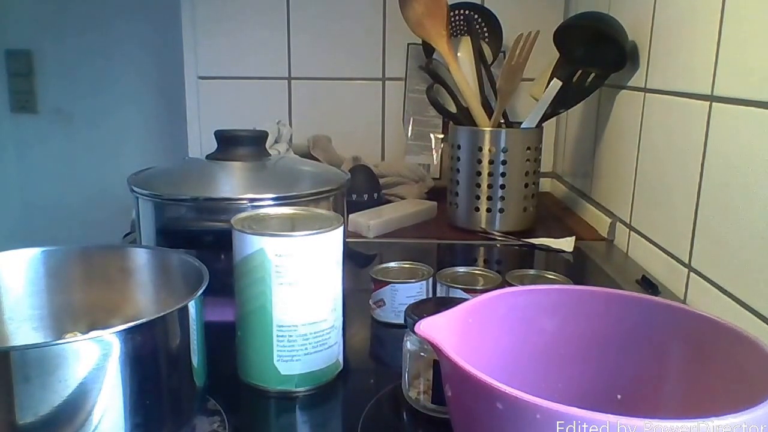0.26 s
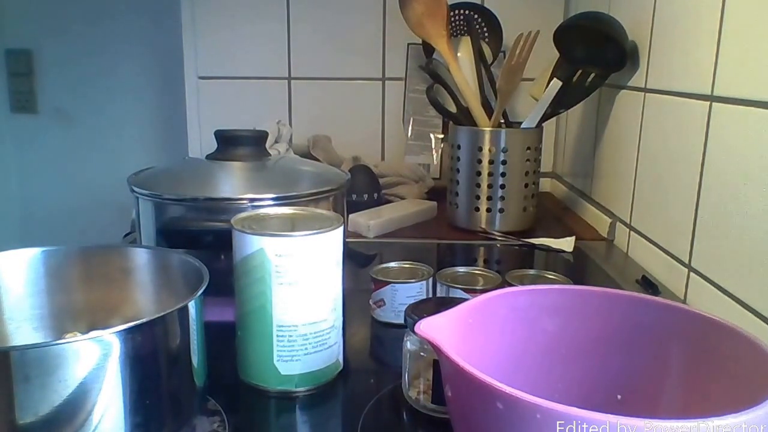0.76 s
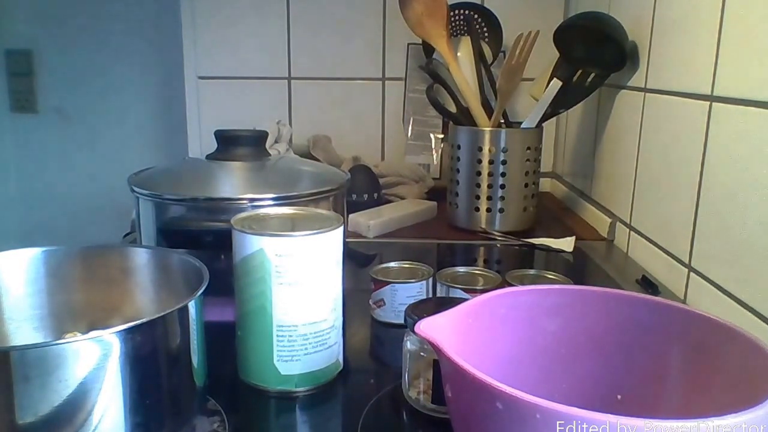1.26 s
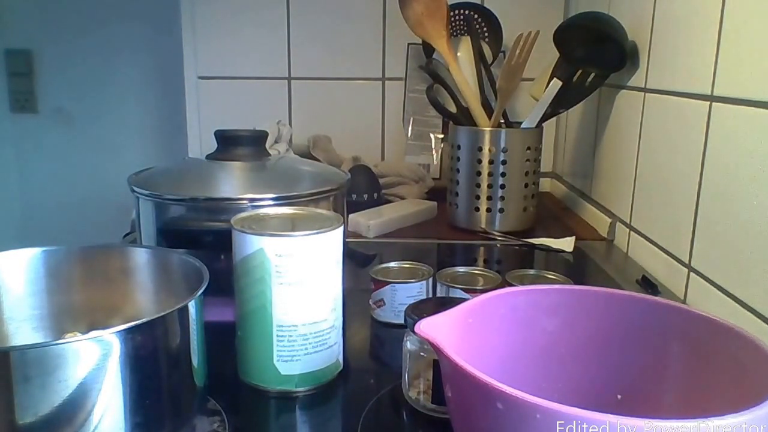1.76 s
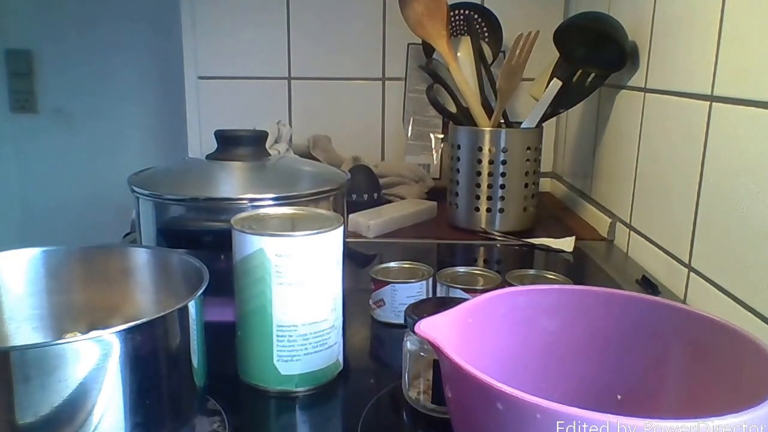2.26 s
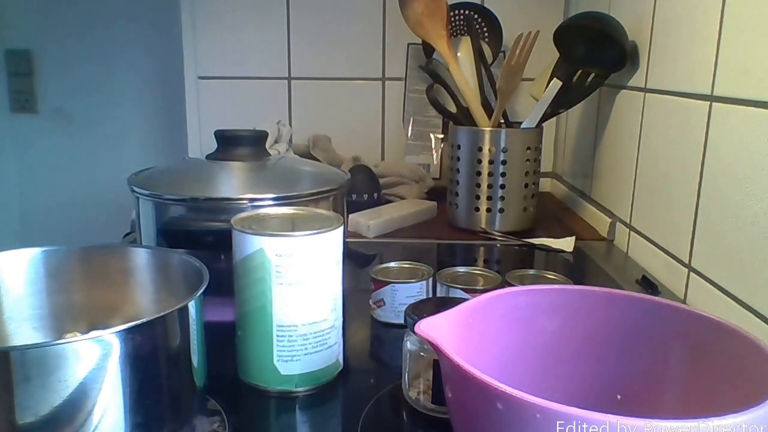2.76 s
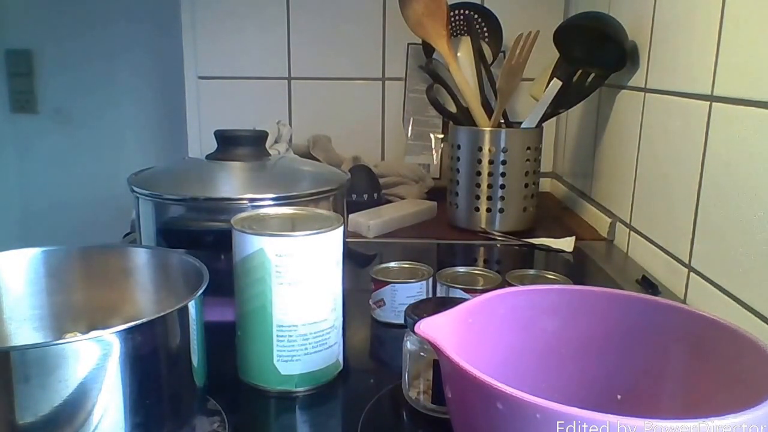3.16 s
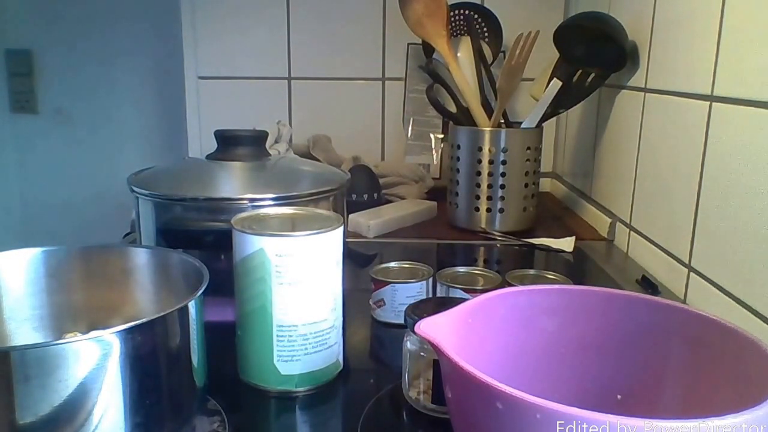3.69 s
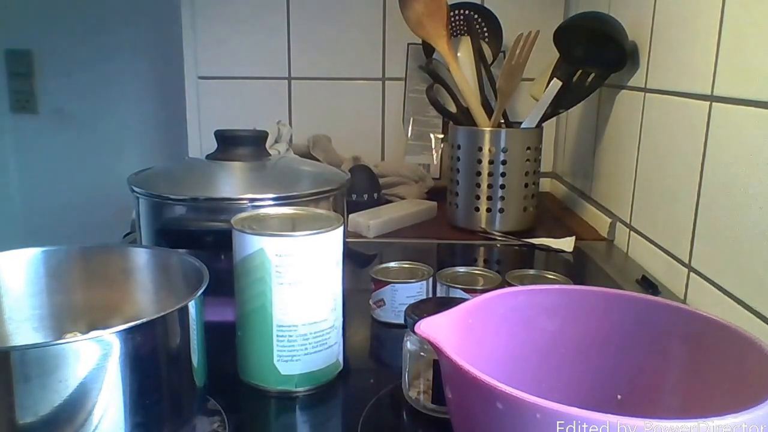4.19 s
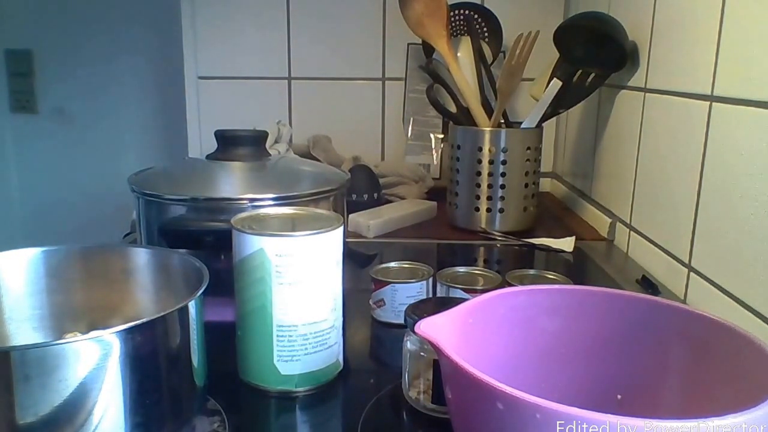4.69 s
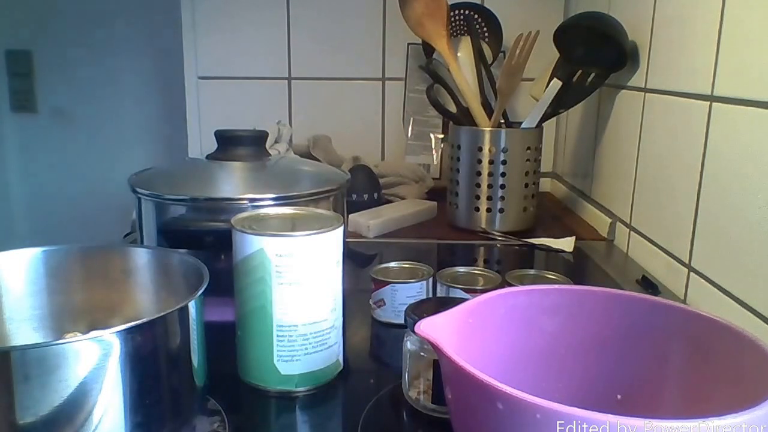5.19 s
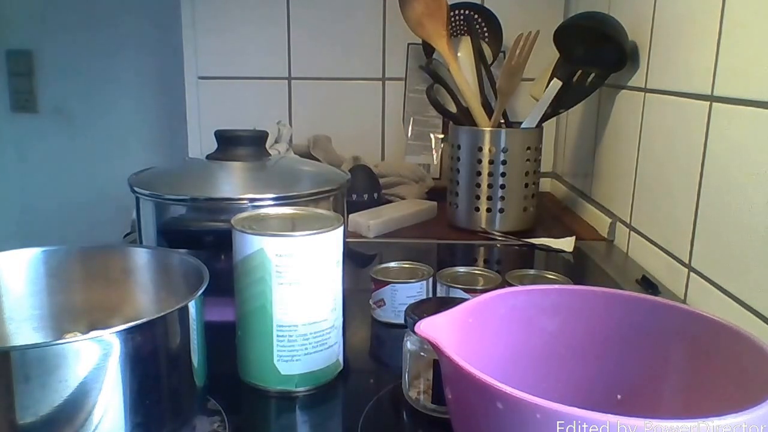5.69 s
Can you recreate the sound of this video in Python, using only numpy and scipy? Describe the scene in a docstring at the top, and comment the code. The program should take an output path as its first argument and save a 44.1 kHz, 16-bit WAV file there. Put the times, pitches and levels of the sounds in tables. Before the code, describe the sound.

A steel pot clatters briefly in a small kitchen, followed by lighter knocks, scuffs and a tin's clink over a humming fan.

```python
"""A small tiled kitchen, where someone moves things about while a fan runs and the mains hums.
A steel pot is shifted on a shelf in a quick cluster of hollow knocks; softer wooden bumps follow,
and later a tin slides and clinks. Each knock makes the object ring, rattle briefly and bounce once.
In between come light utensil taps, and faint scuffs and soft footfalls made of rubbing noise.
The tiles add a short echo to these sounds. Behind them the fan's blades drone and its air rushes."""
import sys
import numpy as np
from scipy import signal
from scipy.fft import rfft, irfft
from scipy.io import wavfile

SR = 44100
rng = np.random.default_rng(int(sys.argv[2]) if len(sys.argv) > 2 else 0)


def unload_audio(sound):
    """Save the sound as a 16-bit wav file, at the path given as the first command line argument."""
    columns = np.transpose(np.atleast_2d(sound))
    # keep every value between -1 and 1, then stretch to whole-number steps
    steps = np.round(np.clip(columns, -1, 1) * 32767)
    wavfile.write(sys.argv[1], SR, steps.astype(np.int16))


N = 261954

ROTOR_HZ, MAINS_HZ = 42.96, 50  # turns of the fan and cycles of the mains in one second
CUTOFF_HZ = 7550  # the top of the treble
FAVOUR_OCTAVES = 0.062  # the spot that is hit boosts the tones about this close to a favoured pitch
SCUFF_T60_S, SCUFF_T60_PER_RISE = 0.22, 7  # t60 is the time a sound takes to fade by 60 dB
FOOTFALL_RISE_S, FOOTFALL_T60_S, WEIGHT_BELOW_HZ = 0.022, 0.27, 150

# Knocks on each object: t/s, level/dB, hollowness/dB, steely edge/dB, hardness/dB,
# bounce delay/s, boost/dB, favoured f/Hz (two of these for the pot)
POT_KNOCKS = [(0.470, -20, 6.5, -1, 16.5, 0.016, 8.3, 372, 4990),
              (0.500, -22, 0.5, -3, 10.5, 0.011, 15, 1013, 381),
              (0.587, -22, 2, 2, 0, 0.018, 8.8, 822, 230.6), (0.630, -25, -5, -4, 3.5, 0.018, 12, 202, 610),
              (0.652, -15.5, -7.5, -5.5, 2.5, 0.014, 6.8, 1316, 2262),
              (0.698, -24.5, -11, -7, 1, 0.012, 11.8, 966, 1090),
              (0.714, -24.5, -5, -11, -0.5, 0.009, 14.7, 150, 1316),
              (0.785, -45, -23, 10.5, 3, 0.024, 11, 1550, 2702)]
SHELF_KNOCKS = [(1.116, -34, -11, -2.5, -2.5, 0.019, 10.5, 233),
                (1.155, -37.5, -1, 1, -13, 0.03, 12.5, 240), (1.592, -35.5, -3, 1, -1.5, 0.017, 4, 1600),
                (1.612, -37.5, -1.5, 5, -11, 0.02, 7, 683), (1.634, -46, -2, -3, -14, 0.02, 12.5, 246),
                (4.560, -42, 4.5, -4, 6.5, 0.031, 7, 664), (4.605, -49, -5, -3.5, -19, 0.0095, 8, 340)]
TIN_KNOCKS = [(4.529, -34.5, -2.5, -7, 28.5, 0.012, 1, 3560)]
UTENSIL_KNOCKS = [(0.205, -45, -14.5, -4.5, 25.5, 0.021, 2, 2780),
                  (1.156, -49, -9, -1, 11, 0.017, 14, 2830), (1.367, -38.5, -7, 1, 5, 0.012, 9.5, 3140),
                  (1.382, -44, 2, -8, 1, 0.008, 6, 470), (3.256, -40, -13, -8, 17.5, 0.0089, 7, 4400)]
# The tones each object rings with: f/Hz, level/dB, t60/s
POT_TONES = [(146.7, -10, 0.15), (201.7, -2, 0.11), (228.4, 0.5, 0.11), (344, 1, 0.13), (369.7, -5.5, 0.19),
             (451.4, -8.5, 0.15), (616, -11, 0.16), (686.5, -2, 0.12), (748, -1.5, 0.09), (820, -10, 0.27),
             (955, -20.5, 0.51), (980, -1.5, 0.13), (1006, -4.5, 0.095), (1039, -14, 0.34),
             (1082, -3, 0.08), (1156, -20.5, 0.45), (1230, -12, 0.17), (1313.6, -7.5, 0.21),
             (1555, -13.5, 0.31), (1610, -4.5, 0.13), (1693, -6.5, 0.13), (1747, -4.5, 0.05),
             (1900, -17.5, 0.18), (2157, -14.5, 0.23), (2264, -11, 0.17), (2702, -24.5, 1),
             (2750, -17, 0.16), (3530, -10.5, 0.088), (3910, -6, 0.09), (4253, -12, 0.1), (4790, -8, 0.2),
             (4970, -8, 0.071), (5240, -19, .18), (5900, -12.5, 0.14), (6500, -4, 0.12),
             (6940, -11.5, 0.18), (7090, -6, 0.13)]
SHELF_TONES = [(238.2, 12, 0.075), (327, 0, 0.2), (490, 5, 0.17), (703, -3.5, 0.098), (1035, -4, 0.11),
               (1123, -6, 0.1), (1620, -7.5, 0.088), (1957, -3, 0.12)]
TIN_TONES = [(985, 0.5, 0.092), (1340, 2.5, 0.084), (2010, -5, 0.096), (2180, 3, 0.13), (2400, -6, 0.085),
             (2720, -5, 0.093), (3560, -0.5, 0.068), (3850, -2, 0.077), (4450, -5, 0.09), (4600, -4, .1),
             (4860, -1.5, 0.17), (4880, -1, .075), (5730, -11.5, .08), (6360, 1, .08), (6950, -2.5, 0.065)]
UTENSIL_TONES = [(470, 4.5, 0.066), (896, -2, 0.1), (1244, -4, 0.098), (1670, -10.5, 0.15),
                 (2280, -1.5, 0.091), (2810, -4, 0.075), (3144, -5, 0.075), (3740, -4, 0.11),
                 (4600, -0.5, 0.11), (5320, -10.5, .14), (6230, -3, 0.11), (6580, -4, .11),
                 (7030, -1.5, 0.12)]
# The five bands of a knock (thud, hollow, clank, edge, click): f/Hz
KNOCK_BANDS_HZ = [200, 390, 1150, 1750, 4500]
# Those bands for a hit on the middle of an object's side: level/dB
KNOCK_BANDS_DB = [3, 2, 4, -1, -24]
# Hard hits click and soft ones thud: each band's share of the hardness
HARDNESS_SHARES = [-0.69, 0.04, -0.035, 0.22, 0.68]
# Tone colour of the crack of a hard hit: f/Hz, level/dB
CRACK_COLOUR = [(70, -55.5), (140, -12.5), (350, 12), (540, 0.5), (750, 1), (1100, -5), (1430, -12.5),
                (1650, -8.5), (2200, -10), (2500, -14.5), (2900, -15), (3300, -25.5), (4300, -12.5),
                (5000, -8), (7300, -16)]
# Smooth slides: middle t/s, spread/s, centre f/Hz, width/Hz, level/dB
SLIDES = [(2.254, 0.042, 1790, 1100, -51), (3.82, 0.048, 2200, 3000, -56.5), (4.15, 0.043, 694, 504, -39.5),
          (4.335, 0.053, 5000, 3000, -58.5), (4.462, 0.016, 1650, 1100, -45.5),
          (4.53, 0.086, 796, 590, -37.5), (4.69, 0.053, 676, 500, -43), (5.025, 0.034, 4780, 2420, -48),
          (5.298, 0.022, 5200, 1800, -49.5)]
# Scuffs: t/s, rise/s, level/dB, hiss compared with the rub/dB
SCUFFS = [(0.208, 0.016, -41, -17), (1.511, 0.021, -42, -17), (2.205, 0.032, -45.5, -13.5),
          (3.247, 0.015, -46.5, -1), (3.851, 0.018, -41.5, -21), (4.366, 0.013, -40.5, -4),
          (4.399, 0.021, -42, -0.5), (4.439, 0.0082, -41.5, -12.5), (4.829, 0.017, -52, 4.5),
          (4.882, 0.021, -38, -16), (5.138, 0.015, -49.5, -6), (5.258, 0.011, -48, 4.5),
          (5.335, 0.046, -40.5, -15.5), (5.408, 0.016, -43, -9.5), (5.521, 0.024, -39, -14.5),
          (5.803, 0.025, -40.5, -15), (5.856, 0.014, -43, -5.5)]
# The three bands of a scuff (bass, rub, hiss): f/Hz
SCUFF_BANDS_HZ = [90, 1000, 5000]
# Tone colour of rubbing: f/Hz, level/dB
RUB_COLOUR = [(30, -18.5), (60, -2.5), (110, 12.5), (250, 2.5), (600, -13), (1000, 1), (2000, 0),
              (3000, -10), (4100, -10.5), (5000, -7.5), (6200, -7), (7300, -11)]
# Soft steps and thuds of shifting weight: t/s, level/dB, extra deep bass/dB
FOOTFALLS = [(0.218, -30, 0), (0.699, -43.5, 2), (3.785, -36, 7), (3.861, -44, 4), (4.835, -36, 2.5),
             (5.312, -36, -5), (5.359, -40, 1)]
# A sole muffles all but the thump: f/Hz, level/dB
SOLE_COLOUR = [(40, -6.5), (65, -0.5), (100, -3.5), (220, -3), (1000, -9), (5000, -20)]
# How long the kitchen echoes: f/Hz, t60/s
KITCHEN_T60 = [(80, 0.19), (250, 0.24), (1000, 0.35), (3000, 0.81), (7000, 0.72)]
# Loudness of the fan's blade tone and of the octave above it: t/s, level/dB
BLADE_LEVEL = [(0, -41.5), (1.0, -38.5), (1.83, -45), (2.6, -38), (4.7, -40.5), (5.9, -37)]
OCTAVE_LEVEL = [(0, -38), (0.23, -57.5), (0.5, -33.5), (1.3, -43), (1.95, -36), (2.25, -40), (3.3, -37.5),
                (3.65, -40), (5.3, -38.5), (5.9, -40)]
# Weak fan tones: multiple of the turning speed, level/dB
WEAK_FAN_TONES = [(3, -54.5), (7, -52.5), (12, -60.5)]
# Tone colour of the rushing air: f/Hz, level/dB
AIR_COLOUR = [(35, -28.5), (60, -30.5), (85, -8), (112, -12), (135, 2), (200, 2.5), (265, -6), (400, -5.5),
              (800, -6.5), (1250, -15), (2000, -18), (3100, -30.5), (5000, -34), (7400, -36.5)]
# Resonances that the air sets ringing: f/Hz, width/Hz, level/dB
AIR_PEAKS = [(182, 20, -6.5), (239, 20, -5), (341.6, 24.4, 8.5), (460, 17, 1), (685, 31, -3.5),
             (1178, 270, -1.5)]
# Tones of the mains hum: multiple of the mains frequency, level/dB
MAINS_TONES = [(2, -57), (3, -46), (6, -75.5), (10, -61.5)]


def knocks(hits, tones, ring_db, buzz_db, crack_db, rise_s, rattle_t60, sharpness=19.8, hold_s=0.019):
    """Each touch makes an object ring with its own tones and rattle briefly on what it stands on."""
    out, t = np.zeros(N), np.arange(SR // 2) / SR
    rattle = decay(t - hold_s, rattle_t60)
    for start_s, bands_db, boost_db, favoured_hz in hits:
        colour = list(zip(KNOCK_BANDS_HZ, bands_db))
        sound = from_db(crack_db) * noise(len(t), CRACK_COLOUR, colour, overtones()) * rattle
        tremble = rng.standard_normal(len(t))
        for hz, db, t60 in tones:
            # every spot that is hit rings a little differently
            pitch_hz, tone_db = hz * rng.normal(1, .003), rng.normal(db, 1.2)
            closeness = np.exp(-(np.log2(hz / favoured_hz) / FAVOUR_OCTAVES) ** 2).max()
            gain = from_db(tone_db + boost_db * closeness + at_hz(colour, hz))
            ring = decay(t, t60) * np.sin(2 * np.pi * (pitch_hz * t + rng.random()))
            # the rattle smears each tone into a narrow buzz
            buzz = noise_band(tremble, hz, hz / sharpness) * rattle
            sound += gain * (from_db(ring_db) * ring + from_db(buzz_db) * buzz)
        # echoes from close walls pile up over the first milliseconds
        add(out, start_s, sound * swell(t, rise_s))
    return out


def bounces(blows, loss_db, softening_db):
    """An object lands and bounces once; the bounce is softer, or harder if softening_db is negative."""
    for start_s, level_db, hollowness, edge, hardness, delay_s, boost_db, *favoured_hz in blows:
        for bounce in (0, 1):
            colour_db = np.add(KNOCK_BANDS_DB, np.multiply(HARDNESS_SHARES, hardness - bounce * softening_db))
            colour_db[1] += hollowness
            colour_db[3] += edge
            bands_db = level_db - bounce * loss_db + colour_db
            yield start_s + bounce * delay_s, bands_db, boost_db, np.array(favoured_hz)


def overtones(ripple_db=7.5, count=90):
    """Crowded high resonances, different at every spot that is touched: rows of f/Hz, level/dB."""
    hz = np.linspace(1500, CUTOFF_HZ, count)
    return np.column_stack([hz, ripple_db * rng.standard_normal(count) * (hz > hz[0])])


def slides():
    """Smooth rubbing swells and fades in one broad resonance of the sliding thing."""
    out, t = np.zeros(N), np.arange(N) / SR
    for middle_s, spread_s, centre_hz, width_hz, db in SLIDES:
        rub = noise_band(rng.standard_normal(N), centre_hz, width_hz)
        out += from_db(db) * rub * np.exp(-((t - middle_s) / spread_s) ** 2)
    return out


def scuffs(bass_db=-24.0):
    """Short scrapes: one that starts more slowly also fades more slowly."""
    out = np.zeros(N)
    for start_s, rise_s, db, hiss_db in SCUFFS:
        colour = list(zip(SCUFF_BANDS_HZ, (bass_db, 0, hiss_db)))
        t60 = SCUFF_T60_S + SCUFF_T60_PER_RISE * rise_s
        add(out, start_s, from_db(db) * rubbing(colour, rise_s, t60))
    return out


def footfalls():
    """Weight shifts onto a sole, which muffles the rubbing into a low thump."""
    out = np.zeros(N)
    for start_s, db, weight_db in FOOTFALLS:
        colour = [(hz, level + weight_db * (hz < WEIGHT_BELOW_HZ)) for hz, level in SOLE_COLOUR]
        add(out, start_s, from_db(db) * rubbing(colour, FOOTFALL_RISE_S, FOOTFALL_T60_S))
    return out


def rubbing(colour, rise_s, t60):
    """Two surfaces rub in a burst of noise that swells and dies away."""
    t = np.arange(SR // 2) / SR
    rub = noise(len(t), RUB_COLOUR, colour, overtones(ripple_db=3.0))
    return rub * swell(t, rise_s) * decay(t - rise_s, t60)


def kitchen_echo(sound, echo_db=-8.0, first_echo_s=0.0011):
    """Tiled walls add a short, dense echo that lasts longer in the treble than in the bass."""
    t, tail = np.arange(SR) / SR, 0
    for low_hz in 40 * 2 ** np.arange(8):
        octave_filter = signal.butter(2, [low_hz, 2 * low_hz], "band", fs=SR, output="sos")
        band = signal.sosfilt(octave_filter, rng.standard_normal(SR))
        fade = decay(t, at_hz(KITCHEN_T60, low_hz * np.sqrt(2))) * np.minimum(t / first_echo_s, 1)
        tail = tail + band * fade / np.linalg.norm(fade)
    return sound + from_db(echo_db) * signal.fftconvolve(sound, tail)[:N]


def fan_drone():
    """Four blades pass in each turn, making a tone, its octave and a few weak extra tones."""
    blade = gain_curve(BLADE_LEVEL) * hum(ROTOR_HZ, [(4, 0)], waver_db=.6, wander_hz=.025)
    octave = gain_curve(OCTAVE_LEVEL) * hum(ROTOR_HZ, [(8, 0)], waver_db=.9, wander_hz=.025)
    return blade + octave + hum(ROTOR_HZ, WEAK_FAN_TONES, waver_db=2.0, wander_hz=0.018)


def fan_air(start_db=-38, rise_db_per_s=0.1536):
    """The fan's rush of air, coloured by its housing and the room, slowly grows a little louder."""
    rush = noise(N, AIR_COLOUR)
    ringing = sum(from_db(db) * resonance(rush, hz, width_hz) for hz, width_hz, db in AIR_PEAKS)
    return rms_one(rush + ringing) * from_db(start_db + rise_db_per_s * np.arange(N) / SR)


def hum(base_hz, tones, waver_db, wander_hz):
    """A fan or the mains hums at multiples of one slightly unsteady rate; each tone wavers in level."""
    angle = 2 * np.pi * np.cumsum(base_hz + wander_hz * drift(0.48)) / SR
    out = np.zeros(N)
    for multiple, db in tones:
        gain = from_db(db + waver_db * drift(8.8))
        out += gain * np.sin(multiple * angle + 2 * np.pi * rng.random())
    return np.sqrt(2) * out


def noise(size, *colours):
    """Noise shaped by the sum of some tone colours; 0 dB is a power of 1 in each kilohertz."""
    hz = np.arange(size // 2 + 1) * SR / size
    gain = from_db(sum(at_hz(points, hz) for points in colours))
    return irfft(rfft(rng.standard_normal(size)) * gain, size) * np.sqrt(SR / 2000)


def noise_band(hiss, hz, width_hz):
    """Pass noise through the same resonance twice and scale it to strength 1."""
    return rms_one(resonance(resonance(hiss, hz, width_hz), hz, width_hz))


def resonance(x, hz, width_hz):
    """Let through what lies near one pitch and weaken the rest."""
    r = np.exp(-np.pi * width_hz / SR)
    feedback = [1, -2 * r * np.cos(2 * np.pi * hz / SR), r * r]
    return signal.lfilter(np.array([1, 0, -1]) * (1 - r * r) / 2, feedback, x)


def drift(rate_hz, step=40, warm_up=2000):
    """Smooth random wandering, typically about 1 away from zero."""
    r = np.exp(-2 * np.pi * step * rate_hz / SR)
    jitter = rng.standard_normal(N // step + warm_up + 2)
    slow = signal.lfilter([1], [1, -2 * r, r * r], jitter)[warm_up:]
    return np.interp(np.arange(N) / step, np.arange(len(slow)), rms_one(slow))


def swell(t, rise_s):
    """Rise smoothly from 0 to 1."""
    return np.sin(np.pi / 2 * np.minimum(t / rise_s, 1)) ** 2


def decay(t, t60):
    """Stay at 1 until t is 0, then fade by 60 dB every t60 seconds."""
    return np.exp(-np.log(1000) * np.maximum(t, 0) / t60)


def gain_curve(points):
    """Join (t/s, level/dB) points into a gain for every sample."""
    return from_db(np.interp(np.arange(N) / SR, *np.transpose(points)))


def at_hz(points, hz):
    """Read between (f/Hz, value) points, with octaves evenly spaced."""
    freqs, values = np.transpose(points)
    return np.interp(np.log(hz + 1e-3), np.log(freqs), values)


def from_db(db):
    """Turn decibels into a gain to multiply by."""
    return 10 ** (np.asarray(db) / 20)


def rms_one(x):
    """Scale a signal so its average strength (rms) is 1."""
    return x / np.sqrt(np.mean(x ** 2) + 1e-20)


def add(track, start_s, sound):
    """Mix a sound into a track at the given time."""
    start = int(start_s * SR)
    track[start:start + len(sound)] += sound[:N - start]


def scene():
    """Knocks, slides and steps echo in the kitchen, over the fan and the mains hum."""
    mains = hum(MAINS_HZ, MAINS_TONES, waver_db=-1.5, wander_hz=0.0085)
    pot = knocks(bounces(POT_KNOCKS, loss_db=5.5, softening_db=-2.5), POT_TONES,
                 ring_db=-1.0, buzz_db=-18.5, crack_db=-11.0, rise_s=0.019, rattle_t60=0.3)
    shelf = knocks(bounces(SHELF_KNOCKS, loss_db=7.0, softening_db=-6.0), SHELF_TONES,
                   ring_db=-1.5, buzz_db=-7.5, crack_db=-2.0, rise_s=0.016, rattle_t60=0.11)
    tin = knocks(bounces(TIN_KNOCKS, loss_db=6.5, softening_db=3.0), TIN_TONES,
                 ring_db=-0.5, buzz_db=-8.0, crack_db=-2.5, rise_s=0.0087, rattle_t60=0.058)
    utensil = knocks(bounces(UTENSIL_KNOCKS, loss_db=5.0, softening_db=10.0), UTENSIL_TONES,
                     ring_db=7.5, buzz_db=-8.0, crack_db=-0.5, rise_s=0.014, rattle_t60=0.15)
    shuffling = (scuffs() + footfalls()) * from_db(-drift(rate_hz=19.0))  # rubbing catches unevenly
    handling = pot + shelf + tin + utensil + shuffling + slides()
    return (fan_drone() + fan_air() + mains + kitchen_echo(handling))[None]


def record(dry, ceiling=0.93):
    """A small microphone loses the deep bass, rounds off loud peaks and cuts the highest treble."""
    thin = signal.sosfilt(signal.butter(2, 45, "high", fs=SR, output="sos"), dry)
    rounded = ceiling * np.tanh(thin / ceiling)
    return signal.sosfilt(signal.ellip(10, .2, 48, CUTOFF_HZ, fs=SR, output="sos"), rounded)


dry = scene()
out = record(dry)
unload_audio(out)
```